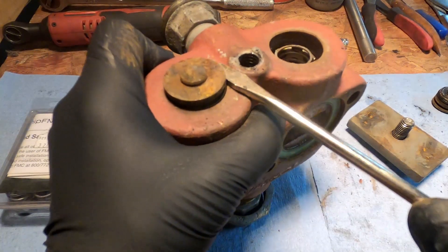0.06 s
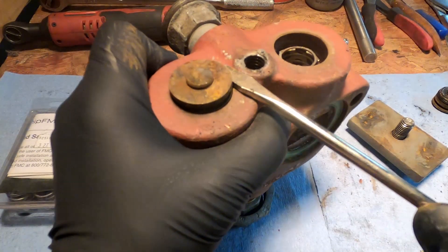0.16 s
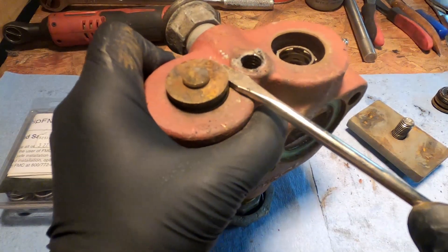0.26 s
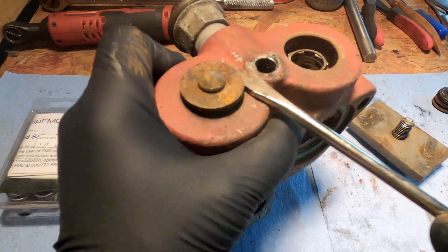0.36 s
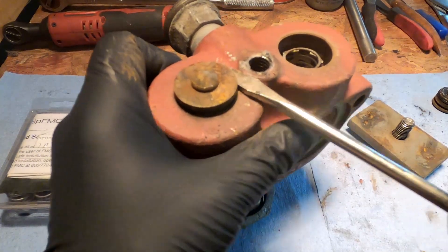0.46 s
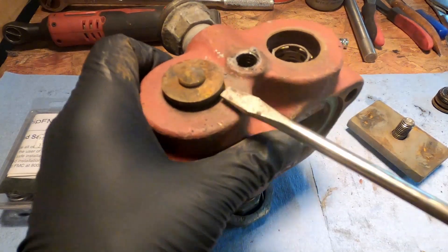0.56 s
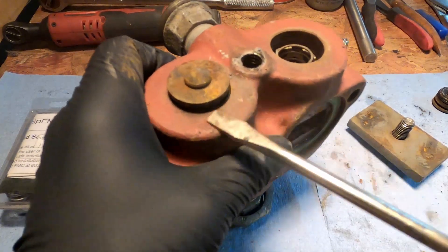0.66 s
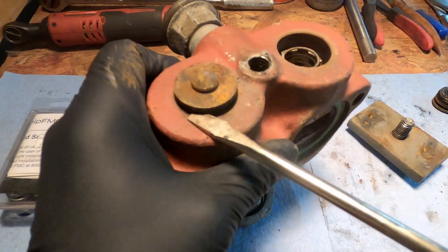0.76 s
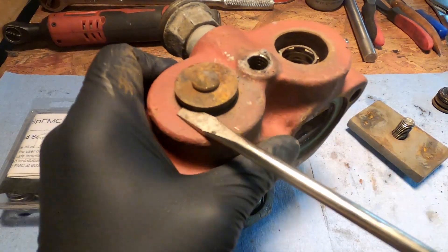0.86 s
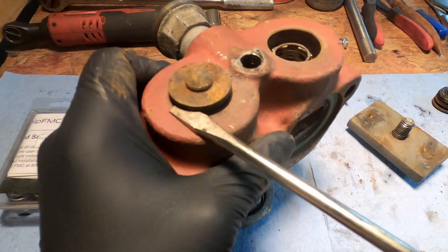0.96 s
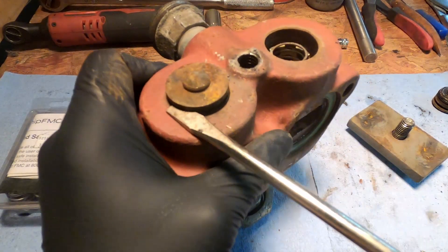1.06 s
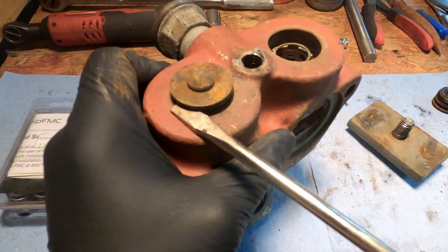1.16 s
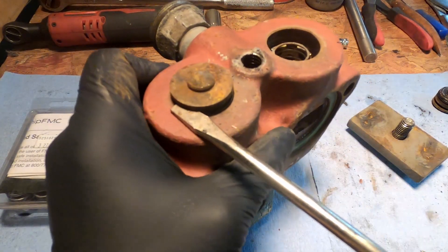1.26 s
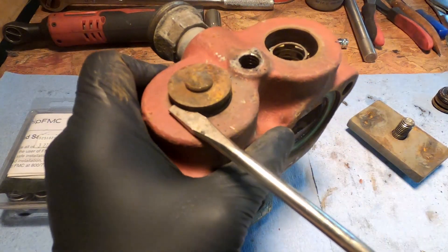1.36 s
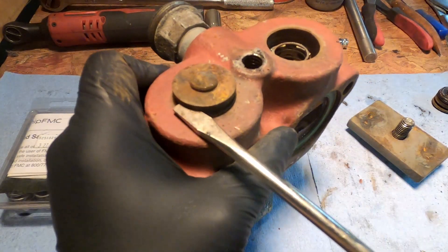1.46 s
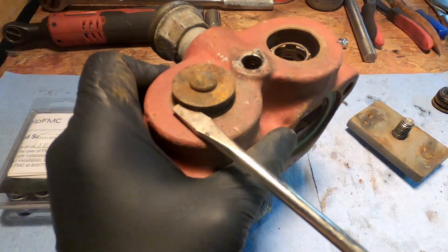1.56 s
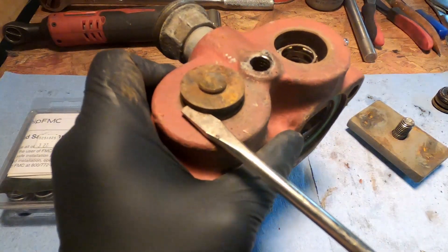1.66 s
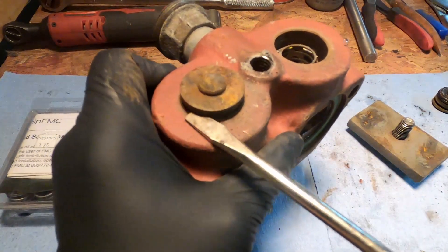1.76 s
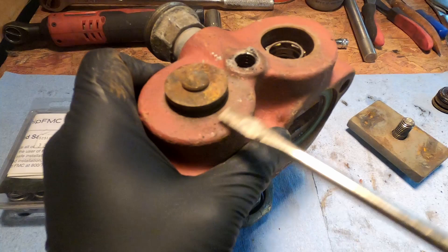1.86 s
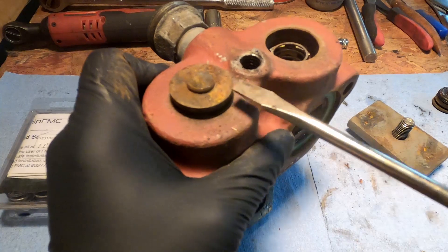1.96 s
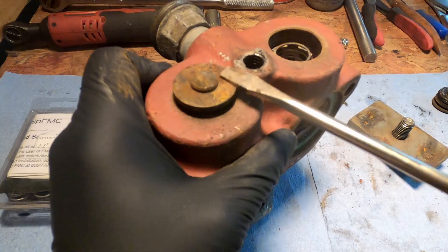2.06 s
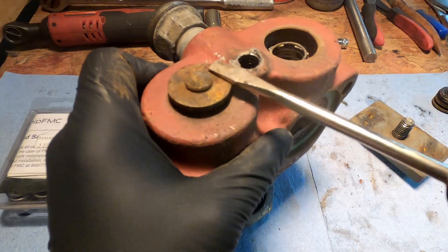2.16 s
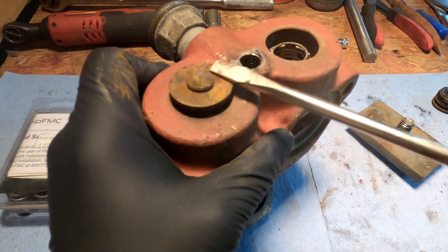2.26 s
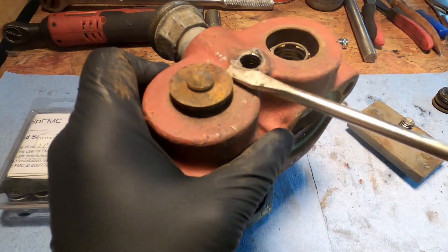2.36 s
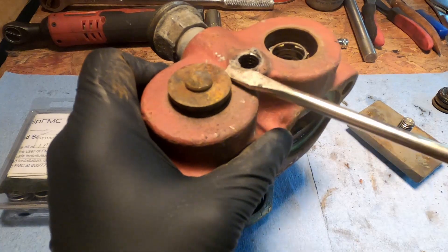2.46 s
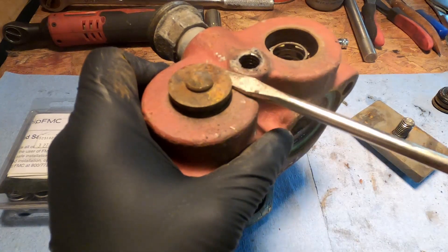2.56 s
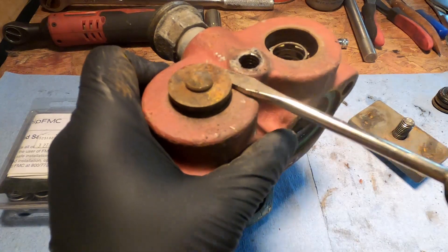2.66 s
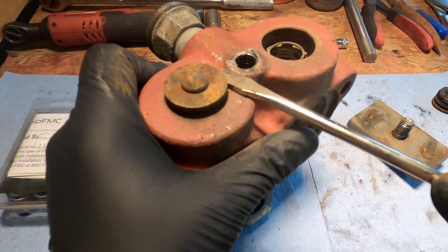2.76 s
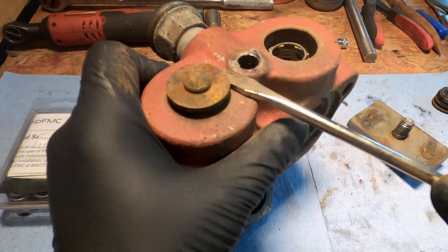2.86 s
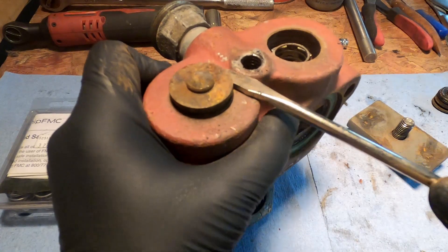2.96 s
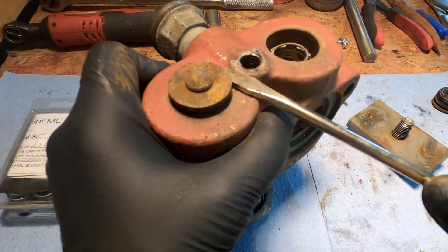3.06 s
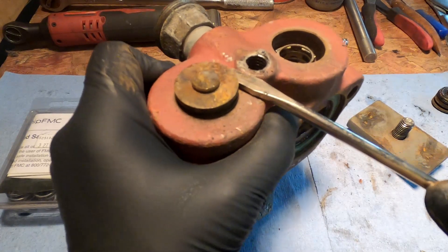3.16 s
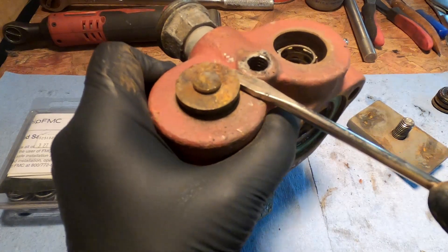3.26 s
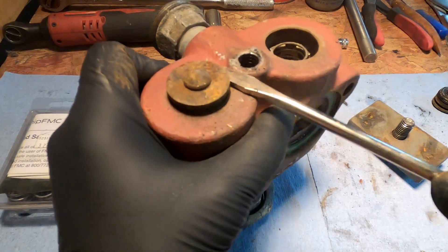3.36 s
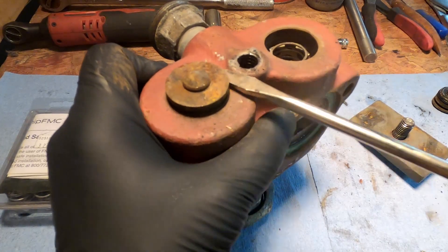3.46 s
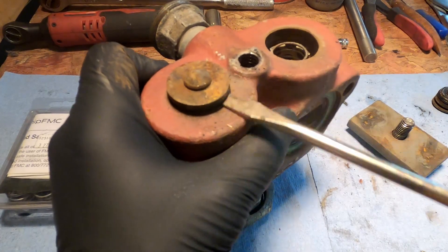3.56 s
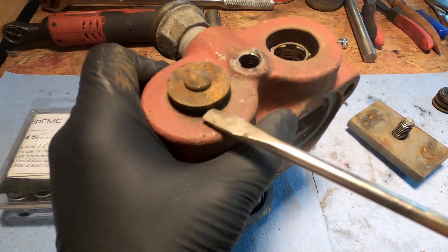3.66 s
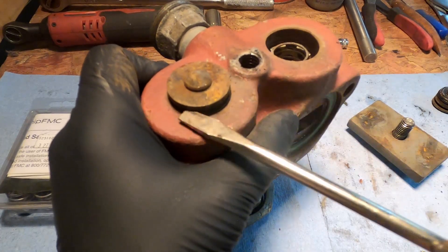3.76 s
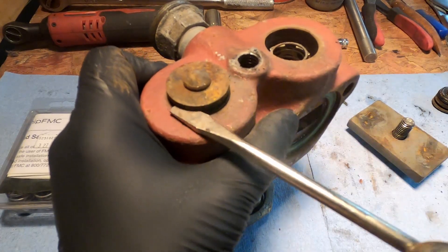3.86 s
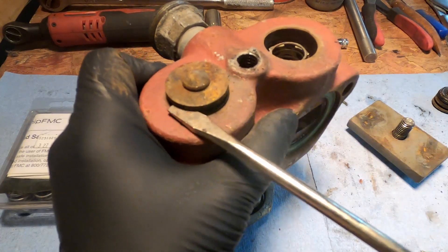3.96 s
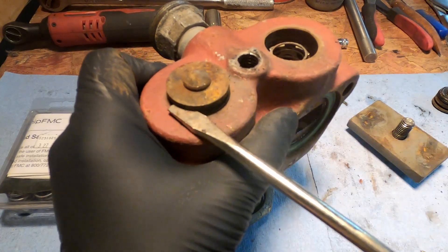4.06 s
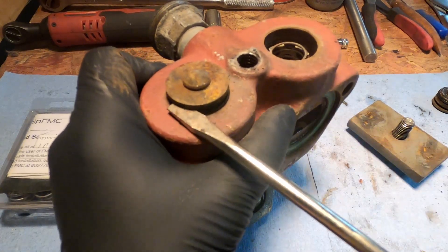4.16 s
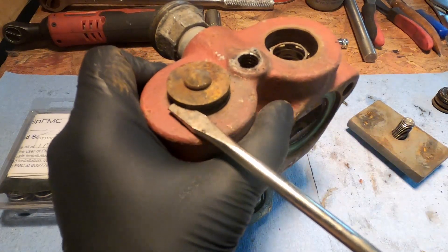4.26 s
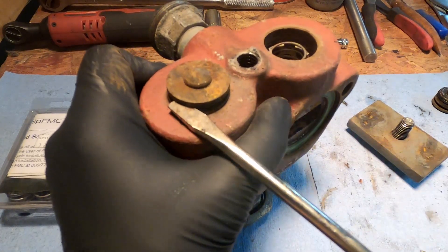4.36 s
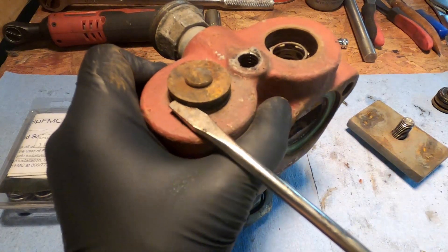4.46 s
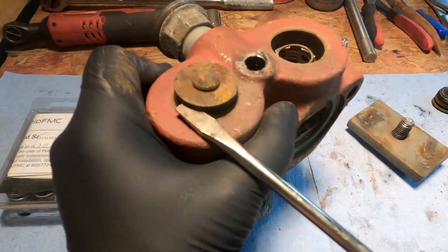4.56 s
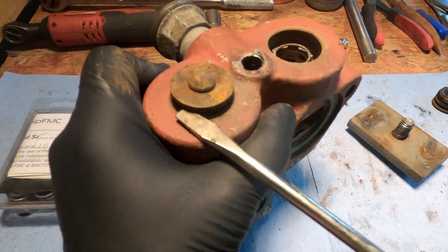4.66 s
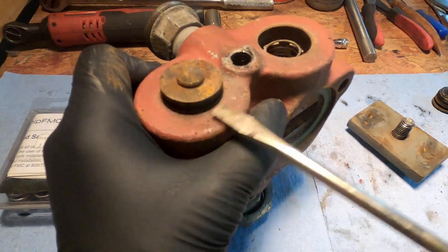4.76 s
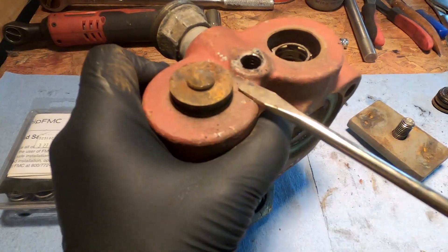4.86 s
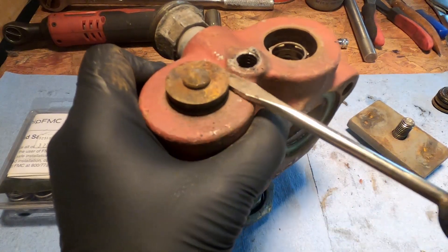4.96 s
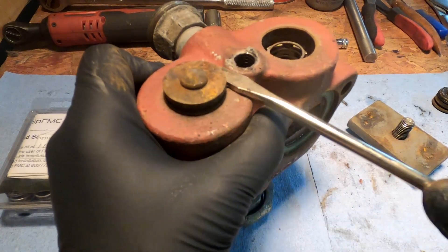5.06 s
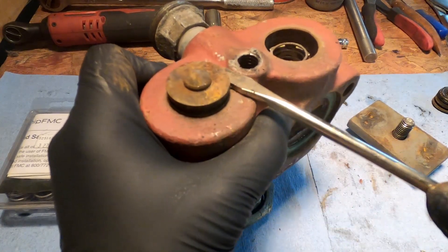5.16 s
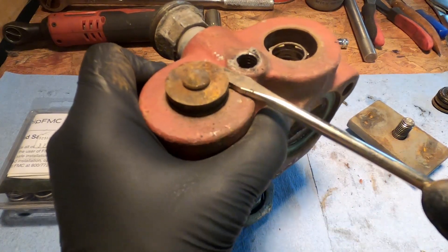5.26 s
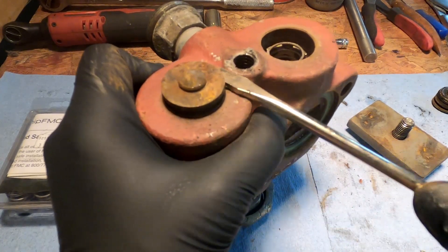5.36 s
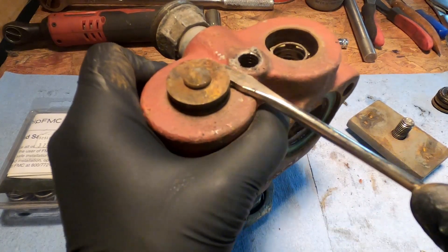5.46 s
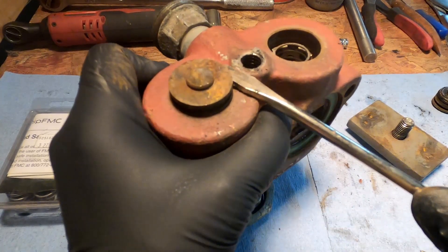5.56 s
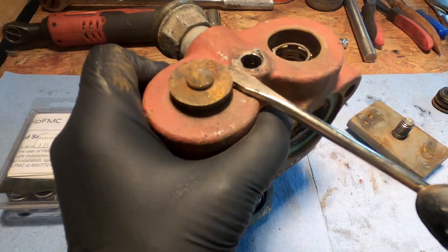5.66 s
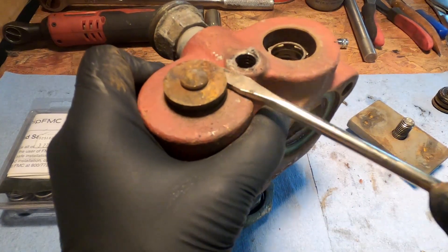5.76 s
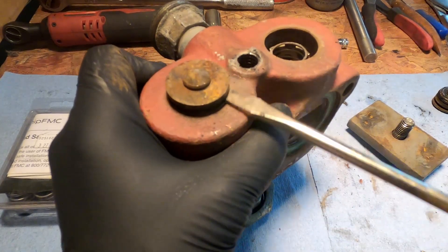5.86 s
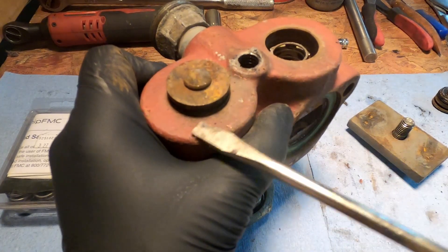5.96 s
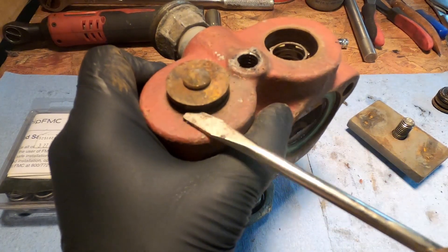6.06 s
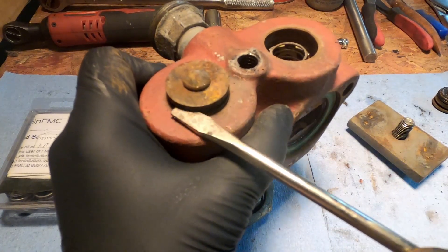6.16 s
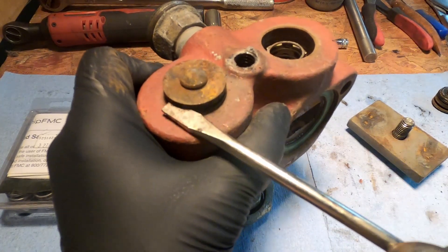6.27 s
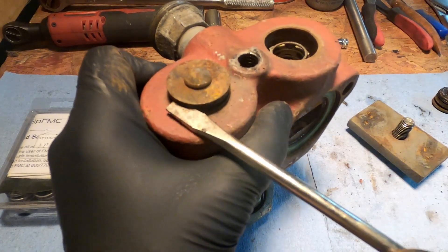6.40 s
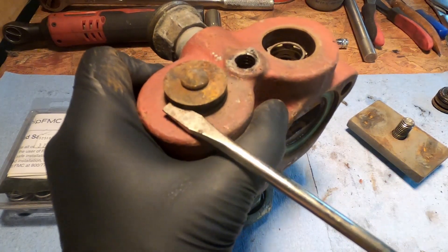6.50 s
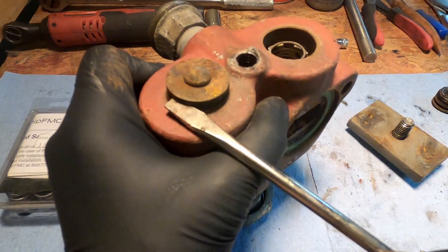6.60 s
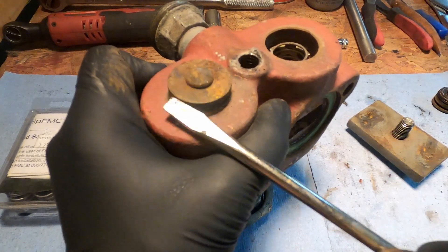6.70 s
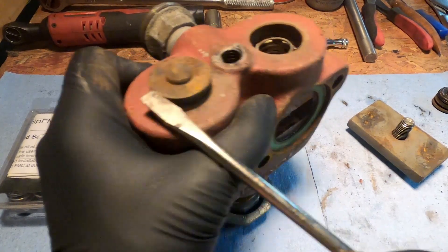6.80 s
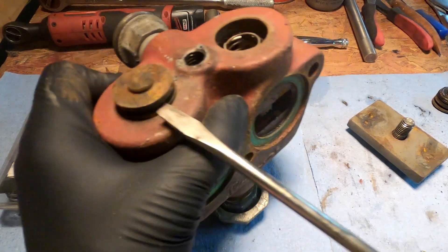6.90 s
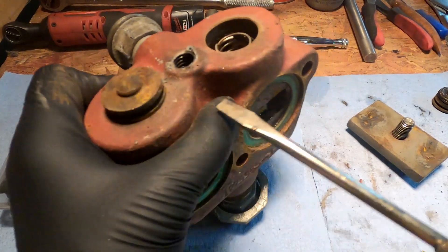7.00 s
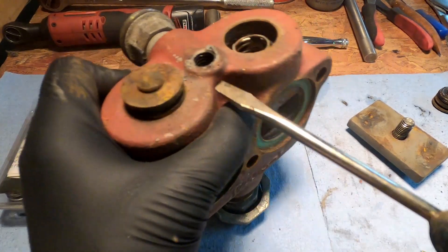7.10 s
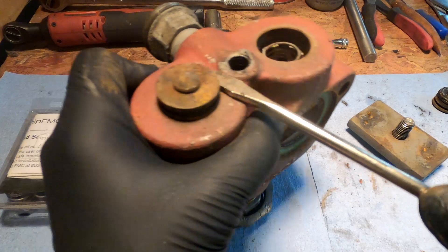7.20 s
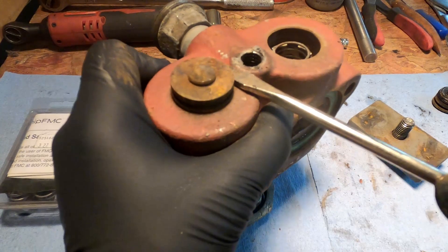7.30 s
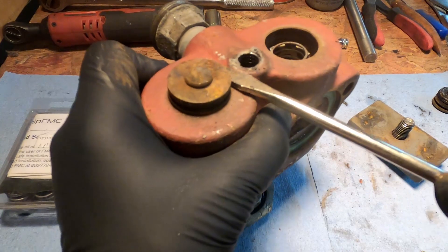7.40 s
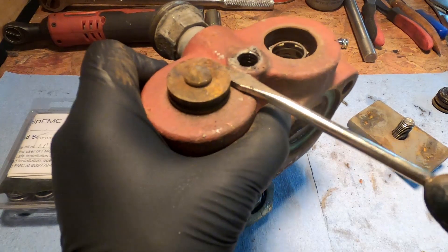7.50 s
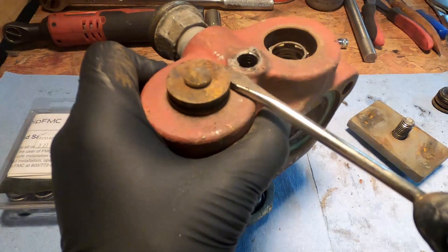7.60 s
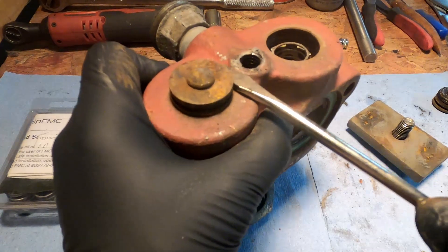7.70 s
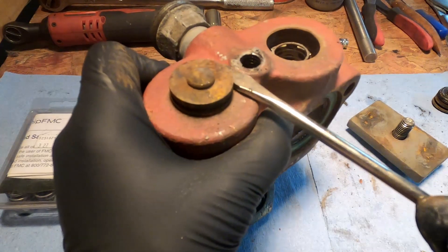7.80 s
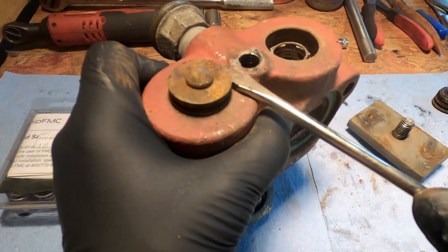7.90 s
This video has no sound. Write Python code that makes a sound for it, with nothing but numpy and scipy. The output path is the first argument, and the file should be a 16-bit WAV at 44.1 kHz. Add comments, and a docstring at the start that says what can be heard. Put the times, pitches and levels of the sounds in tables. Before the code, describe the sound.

Close, dry handling of a heavy metal casting: a screwdriver blade ticks, clacks and briefly scrapes over paint and rust in uneven bursts. Pauses separate the groups. Strong knocks come near 2.6 and 6.2 seconds, then a hard slip with a bright clank and skid near 6.8. The bench thuds and rumbles softly beneath, in a quiet small workshop.

```python
"""A screwdriver blade is pushed under a brass cap on a cast pump head held in a gloved hand.
The blade scrapes over paint (dense uneven clicks) and ticks against cap and casting (clicks with a short
rattle); both ring damped metal modes, and one slip is hard. The workbench rumbles and thuds as noise and
soft pushes through its resonances, and a thin squeal wavers briefly. Feedback delays give the small
workshop a short tail, and filtered noise gives it a faint hush."""
import sys
import numpy as np
from scipy import signal
from scipy.fft import rfft, irfft, next_fast_len
from scipy.io import wavfile

SR = 44100
rng = np.random.default_rng(int(sys.argv[2]) if len(sys.argv) > 2 else 0)


def materialize(psi):
    """Save the field psi as 16-bit PCM at rate SR to the path in sys.argv[1].

    A 1-D psi becomes a single channel; in a 2-D psi each row is a channel.
    """
    bounded = np.clip(np.atleast_2d(psi).T, -1, 1)
    quanta = np.round(bounded * 32767).astype(np.int16)
    wavfile.write(sys.argv[1], SR, quanta)


def natural_amplitude(level_db):
    """Convert a level in decibels to a linear amplitude factor, elementwise."""
    exponent = np.asarray(level_db, float) / 20
    return 10 ** exponent


N = 350154  # length in samples

# Workshop air, relative spectrum: hz, level_db (per Hz)
AIR_SPECTRUM = [(18, -34), (30, 9.5), (65, 5), (118, 3.5), (196, 5.5), (314, -3.5), (399, -5.5),
                (467, -12.5), (547, -21.5), (593, -8), (659, -18.5), (7470, -29.5), (8300, -36.5),
                (10000, -49.5), (16500, -55)]
# Likeness of the air at left and right: hz, likeness (1 = identical)
AIR_LIKENESS = [(60, 0.44), (130, 0.61), (640, 0.2), (15000, 0.068)]
AIR_DB = -62.5  # rms
SHOP_T60_S, WALL_CUT_HZ, SHOP_DB = 0.23, 2800, -22

# Bench shaken by the hands: start_s, top_db, knock_db
BENCH_MOTION = [(0.0, -71, -64), (0.15, -49.5, -56.5), (0.77, -80, -60.5), (0.84, -48, -58),
                (1.39, -59.5, -63.5), (2.32, -67, -59.5), (3.25, -63.5, -82), (3.36, -51, -76.5),
                (3.58, -54, -57.5), (3.63, -75, -54.5), (4.22, -56.5, -71), (4.64, -76, -76),
                (4.71, -67, -63.5), (4.88, -74, -60), (5.64, -67, -75), (6.1, -52.5, -58), (6.21, -74, -58),
                (6.59, -51.5, -80), (6.7, -73, -70), (6.85, -43, -63), (6.96, -52, -45.5),
                (7.23, -75, -66.5), (7.36, -62, -62.5), (7.94, -68, -77)]
# Bench resonances, from slow sway to table top to knocking: centre_hz, width_hz, level_db
SWAY_MODES = [(27.8, 22, 0)]
TOP_MODES = [(80.86, 2.7, 0)]
KNOCK_MODES = [(138, 40, -25.5), (192, 24, -9.5), (205.7, 15, -2.5), (299, 35, -7), (500, 24, -21.5)]
SWAY_DB, SWAY_KICK_DB, SWAY_T60_S = -72.5, -26.5, .45  # steady sway; the hard slip rocks the bench
SLIP_S = 6.834
# Casting knocking on the bench: start_s, push_db
CAST_THUDS = [(0.337, -36.5), (2.5, -42.5), (2.63, -37.5), (3.598, -46), (3.777, -43), (4.639, -49),
              (4.956, -43.5), (6.183, -47.5), (6.117, -43.5), (6.832, -26.5), (7.061, -44.5), (7.278, -41)]

# Faint squeal of the loaded blade: start_s, end_s, pitch_hz, width_hz, level_db
BLADE_SQUEAL = (4.06, 4.3, 1690, 45, -83)

# Casting and blade damped by the glove, nominal modes: pitch_hz, level_db, t60_s
METAL_MODES = [(815, 4, .12), (1080, -5, .025), (1330, -5, .025), (1600, -3, .035), (1800, -5, .03),
               (2300, -1, .025), (2520, -3, .03), (2780, 0, .02), (3030, -3, .03), (3290, -7, .02),
               (3550, -7, .02), (3800, -6, .025), (4150, -5, .025), (4700, -7, .015), (5500, -9, .015),
               (6600, -11, .008), (7400, -11, .008), (8100, -2, .015), (10300, -16, .006)]
# Broad rasp of the contact, relative spectrum: hz, level_db (per Hz)
RASP_SPECTRUM = [(800, 10), (1600, -4), (2800, -16), (4200, -8), (6000, -12), (8300, -4), (10500, -32),
                 (15000, -40)]
# Parts of the metal sound (shank ring, low, middle, upper, bright): low_hz, high_hz
METAL_PARTS = [(750, 890), (950, 2000), (2000, 3500), (3500, 5800), (5800, 16000)]
# Share of the left-right difference in each of those parts: share
PART_SHADING = [0.15, 0.6, 1.1, 1.8, 5]
SPOTS, SPOT_SPREAD_DB = 3, 2.5  # contact spots, and how far mode levels vary between them
SPOT_DETUNE = .025  # relative; grip and contact shift the modes from spot to spot
BODY_CUT_HZ = 700  # so small a body sends little sound below this
COLOUR_FALL_DB = 10.5  # loss one octave away from the colour

# Metal clicks: the blade striking, and three quieter clicks 10 ms apart that lead into the loudest blow:
# start_s, level_db, shank_ring_db, colour (octaves above 1 kHz), bright_share_db
METAL_CLICKS = [(.192, -39, -19, 1.15, -3), (.4996, -28.5, -36, 1.25, -11), (.5356, -38, -22, 1.8, -3),
                (.68, -30.5, 8.5, 0.97, -18), (.7064, -40, -18, 1.2, 0), (.8041, -31, -22, 1.2, -10),
                (.8629, -22, -28, 1.53, -21), (.9237, -40, -20, 1.5, -12), (.9363, -31, -20, 1.3, -10),
                (.98, -34.5, -24, 1.3, -32), (1.5783, -25.5, 0, 0.32, -12.5),
                (1.9907, -35.5, -24, 1.8, -5.5), (2.1325, -28, -9, 0.53, -24),
                (2.1834, -27, -18, 0.96, -25), (2.2525, -49, -17, 1.7, -3), (2.3976, -32, -14, 1, -31),
                (2.6295, -12.5, -36, 1.16, -22), (3.5993, -18, -7.5, 1.11, -9),
                (3.6845, -26, -8, 0.48, -18), (3.7264, -29, -22, 1.34, -9), (3.7725, -16, -11, 1.46, -21),
                (3.8302, -33.5, -3, 0.41, -27), (3.8947, -30, -15, 0.55, -21),
                (3.929, -19, -33, 1.091, -39), (4.1844, -48.5, -20, .9, -9), (4.2906, -51, -27, 2, -5),
                (4.337, -53, -18, 1.4, 1), (4.4722, -34.5, -17, 2.44, -10), (4.789, -32, -23, 0.43, -20),
                (4.827, -34, -24, 0.73, -13), (4.9552, -17, -43, 1.32, -23.5),
                (5.1417, -37.5, -23, 2.3, -9), (5.971, -21.5, -13.5, 1.458, -14.5),
                (6.1157, -18.5, -16, 0.94, -28), (6.1831, -9.5, -10.5, 1.64, -16),
                (6.8034, -46, -16, 1.3, -10), (6.8129, -29, -2, 1.2, -12), (6.8234, -19.5, -1, 1.46, -10.5),
                (6.8347, -1.5, -2, 1.4, -2), (7.0606, -18, -37, 1.17, -15), (7.2733, -24.5, -18, 1.04, -20),
                (7.317, -29, -19, 1.8, -25), (7.3364, -22.5, -2.5, 1.13, -15.5),
                (7.6544, -52.5, -14, 1, -14.5)]
CONTACT_S, RATTLE_SHARE = .0014, .28  # decay of the contact rattle, and its size beside the click
# Faint random ticks scattered through the whole scene: level_db, shank_ring_db, colour, bright_share_db
TICKS_PER_S, TICK, TICK_SPREAD = 4, (-58, -20, 1.9, -5), np.array([3, 3, .3, 3])

# Blade pushed along the paint: start_s, hardest_s, end_s, level_db, colour (octaves above 1 kHz),
# bright_share_db
BLADE_PUSHES = [(.447, 0.464, 0.51, -59.5, 1.33, -12), (0.578, 0.639, 0.62, -53, 1.6, -2),
                (.642, 0.686, 0.7, -36, 1.58, -12.5), (0.702, 0.703, 0.8, -57, 1.76, -4),
                (0.795, 0.864, 0.99, -49, 1.59, -10.5), (0.99, 1.03, 1.15, -71.5, 1.6, -1.5),
                (1.863, 1.87, 1.88, -60.5, 1.3, -5), (1.901, 1.945, 1.962, -50, 0.99, -14),
                (2.129, 2.175, 2.23, -44, 0.97, -15.5), (2.725, 2.752, 2.8, -57, 2.05, 0),
                (2.805, 2.818, 2.853, -49, 1.35, 3), (2.992, 3.06, 3.07, -79.5, 1.6, 9.5),
                (3.36, 3.45, 4.8, -81.5, 1.9, 5), (3.604, 3.656, 3.73, -47.5, 1.5, -13.5),
                (4.387, 4.47, 4.54, -73.5, 2, 3), (4.783, 4.781, 4.8, -55, .7, -24),
                (4.816, 4.825, 4.84, -52, .7, -24), (4.937, 5.004, 5.06, -58.5, 1.05, -20),
                (5.06, 5.13, 5.165, -59, 1.55, -8), (5.538, 5.599, 5.59, -73.5, 1.4, 4.5),
                (5.906, 6, 6.045, -50.5, 1.5, -7.5), (6.635, 6.675, 6.67, -67.5, 2.4, 3),
                (7.268, 7.32, 7.345, -43, .9, -20.5)]
PUSH_START_DB, PUSH_END_DB = -9.5, -12  # relative to the hardest moment
LIFT_S, LIFT_DB = 0.024, -33  # the blade eases off after a push
# Blade skidding on after a blow: start_s, length_s, level_db, colour (octaves above 1 kHz), bright_share_db
BLADE_SKIDS = [(0.193, 0.14, -55.5, 1.15, -2), (0.51, 0.22, -60, 2.1, 1), (1.585, .05, -63, .6, -1),
               (1.996, 0.049, -74, 2.1, 3), (2.293, 0.066, -52, 0.58, -18), (2.392, 0.12, -48, 0.96, -14.5),
               (2.452, 0.13, -62, 2.6, 0.5), (2.636, 0.14, -51, 1.7, -26), (3.782, 0.077, -55.5, 1.8, -24),
               (3.842, 0.11, -63, .6, -30), (3.899, .04, -58, 0.7, -27), (3.938, 0.13, -57, 1.5, -10.5),
               (6.116, 0.087, -48.5, 1.34, -23.5), (6.183, 0.16, -44.5, 1.92, -17),
               (6.836, .3, -42.5, 1.83, -12.5), (7.07, 0.12, -66, 1.76, -14.5), (7.396, 0.1, -55.5, 2.2, 3),
               (7.664, 0.073, -78.5, 0.86, 2)]
SKID_END_DB = -32.5  # change over the whole skid
SHANK_DB, SHANK_FOLLOWS = -15.5, 1.1  # the shank rings most where the contact sounds low

LEFT_LAG_S = 5e-5
SCRAPE_PAN_DB, CLICK_PAN_DB = -1.5, -2  # left minus right


def rms_one(x):
    """Scale to unit rms."""
    return x / np.sqrt(np.mean(x ** 2) + 1e-20)


def in_time(rows):
    """Columns of a curve table, one value a sample."""
    s, *columns = np.transpose(rows)
    return [np.interp(np.arange(N) / SR, s, column) for column in columns]


def at_hz(points, hz):
    """Read a spectrum on a log-frequency axis."""
    point_hz, values = np.transpose(points)
    return np.interp(np.log(hz), np.log(point_hz), values)


def drift(rate_hz):
    """Slow random wander of unit rms, drawn every 40 samples and joined by lines."""
    r = np.exp(-80 * np.pi * rate_hz / SR)
    white = rng.standard_normal(N // 40 + 2002)
    slow = signal.lfilter([1], [1, -2 * r, r * r], white)[2000:]  # skip the filter's start
    return np.interp(np.arange(N) / 40, np.arange(len(slow)), rms_one(slow))


def ring(clicks, hz, t60_s):
    """A unit click sets a decaying sine of starting height 1 ringing."""
    r, w = natural_amplitude(-60 / (t60_s * SR)), 2 * np.pi * hz / SR
    return signal.lfilter([0, np.sin(w)], [1, -2 * r * np.cos(w), r * r], clicks + 1e-18)


def bands(low_hz, high_hz):
    """Half-octave band-passes with their centres."""
    edges = 30 * 2 ** np.arange(0, 9.3, .5)
    return [(np.sqrt(a * b), signal.butter(2, [a, b], "band", fs=SR, output="sos"))
            for a, b in zip(edges, edges[1:]) if low_hz < np.sqrt(a * b) < high_hz]


def placed(x, pan_db):
    """Pan between the two microphones; the left one hears it a little later."""
    late = np.interp(np.arange(N) - LEFT_LAG_S * SR, np.arange(N), x)
    return np.array([late * natural_amplitude(pan_db / 2), x * natural_amplitude(-pan_db / 2)])


def hush():
    """Air noise of the workshop, slightly patchy, with its own left-right likeness in each band."""
    out, white = 0, rng.standard_normal((2, 2, N))
    for k, (hz, sos) in enumerate(bands(30, 17000)):
        mid, side = signal.sosfilt(sos, white[k % 2])  # neighbouring bands use separate noise
        alike = np.clip(at_hz(AIR_LIKENESS, hz), -1, 1)
        gain = natural_amplitude(at_hz(AIR_SPECTRUM, hz) + 1.0 * drift(4))
        out = out + gain * (np.sqrt(1 + alike) * mid + np.sqrt(1 - alike) * side * [[1], [-1]])
    return natural_amplitude(AIR_DB) * rms_one(out)


def workshop(x):
    """Ten feedback delays a side, duller on every round, blurred by rough walls (three all-passes)."""
    size = next_fast_len(N + SR)
    w = 2 * np.pi * np.arange(size // 2 + 1) / size
    dull = (1 + (w * SR / (2 * np.pi * WALL_CUT_HZ)) ** 2) ** -0.25
    out = np.zeros((2, len(w)), complex)
    for k, lag in enumerate(rng.uniform(0.0065, 0.024, 20) * SR):
        loop = natural_amplitude(-60 * lag / SR / SHOP_T60_S) * dull * np.exp(-1j * w * lag)
        out[k % 2] += (-1) ** (k // 2) * loop / (1 - loop)
    for lag in rng.uniform(0.00066, 0.0044, 3) * SR:
        z = np.exp(-1j * w * lag)
        out *= (z - .6) / (1 - .6 * z)
    return irfft(out * rfft(x, size), size)[:, :N]


def shaken(modes, level_db, lumpy_db):
    """Noise of uneven strength drives two-pole resonances."""
    push = rng.standard_normal(N) * natural_amplitude(lumpy_db * drift(11))
    out = 0
    for hz, width, db in modes:
        r = np.exp(-np.pi * width / SR)
        poles = [1, -2 * r * np.cos(2 * np.pi * hz / SR), r * r]
        out = out + natural_amplitude(db) * rms_one(signal.lfilter([1, 0, -1], poles, push))
    return natural_amplitude(level_db) * rms_one(out)


def bench():
    """The hands shake the bench: sway and table top are alike in both microphones, knocking less so."""
    top_db, knock_db = in_time(BENCH_MOTION)
    t = np.arange(N) / SR
    rocked = (t > SLIP_S) * natural_amplitude(SWAY_KICK_DB - 60 * abs(t - SLIP_S) / SWAY_T60_S)
    sway = shaken(SWAY_MODES, SWAY_DB, lumpy_db=2.0)
    sway = sway + rocked * shaken(SWAY_MODES, 0, lumpy_db=1.5)
    top = shaken(TOP_MODES, top_db, lumpy_db=1.0)
    mid = shaken(KNOCK_MODES, knock_db, lumpy_db=3.0)
    side = shaken(KNOCK_MODES, knock_db, lumpy_db=0.5)
    return sway + top + mid + np.sqrt(1 - .92) * side * [[1], [-1]]


def thuds():
    """A soft push sets the knocking modes of the bench ringing; wide modes die sooner."""
    pushes = np.zeros(N)
    pushes[[round(s * SR) for s, db in CAST_THUDS]] = natural_amplitude([db for s, db in CAST_THUDS])
    rung = sum(natural_amplitude(db) * ring(pushes, hz, 3.4 / width) for hz, width, db in KNOCK_MODES)
    return signal.lfilter([.1], [1, -.9], rung)  # softens the push


def squeal():
    """A thin wavering tone, narrow noise that swells and fades, while the blade creeps under load."""
    start, end, hz, width, db = BLADE_SQUEAL
    t = np.arange(N) / SR
    swell = np.sin(np.pi * np.clip((t - start) / (end - start), 0, 1)) ** .5
    return placed(swell * shaken([(hz, width, 0)], db, lumpy_db=-7.0), SCRAPE_PAN_DB)


def metal_parts(damping, rasp_db, top_hz):
    """What one click draws from the metal, modes plus broad rasp, split into parts of energy 1."""
    click = np.zeros(SR // 6)
    click[0] = 1
    rung = rasp = 0
    # neighbours swing in opposite sense, so no holes open between them
    for k, (hz, db, t60_s) in enumerate(METAL_MODES):
        gain = (-1) ** k * natural_amplitude(db + rng.normal(0, SPOT_SPREAD_DB))
        detuned_hz = hz * (1 + SPOT_DETUNE * (k > 0) * rng.normal())  # the lowest mode stays put
        rung = rung + gain * ring(click, detuned_hz, damping * t60_s)
    for k, (hz, sos) in enumerate(bands(800, 16000)):
        rasp = rasp + (-1) ** k * natural_amplitude(at_hz(RASP_SPECTRUM, hz)) * signal.sosfilt(sos, click)
    both = rms_one(rung) + natural_amplitude(rasp_db) * rms_one(rasp)
    both = signal.sosfilt(signal.butter(4, top_hz, fs=SR, output="sos"), both)
    both = signal.sosfilt(signal.butter(4, BODY_CUT_HZ, "high", fs=SR, output="sos"), both)
    parts = [signal.sosfilt(signal.butter(2, edges, "band", fs=SR, output="sos"), both)
             for edges in METAL_PARTS]
    return [sense * rms_one(p) / np.sqrt(len(p)) for p, sense in zip(parts, (1, -1, 1, -1, 1))]


def shares(colour):
    """Level in dB of the low, middle and upper part: a hump around the colour."""
    # 964000 Hz squared: the reference centre squared, close to 1 kHz
    return [-COLOUR_FALL_DB * (np.log2(low * high / 964000.0) / 2 - colour) ** 2
            for low, high in METAL_PARTS[1:4]]


def metal_clicks():
    """Each listed click or random tick is an impulse and a short rattle that rings the metal."""
    count = int(TICKS_PER_S * N / SR)
    tick_s = rng.uniform(0, N / SR - .1, count)
    ticks = np.c_[tick_s, TICK + TICK_SPREAD * rng.standard_normal((count, 4))]
    s, level_db, shank_db, colour, bright_db = np.transpose(np.r_[METAL_CLICKS, ticks])
    starts = np.round(s * SR).astype(int)
    t = np.arange(int(.008 * SR)) / SR
    contacts = RATTLE_SHARE * rng.standard_normal((len(starts), len(t))) * np.exp(-t / CONTACT_S)
    contacts[:, 0] = 1  # the impulse itself
    spots = [metal_parts(damping=1.0, rasp_db=3.5, top_hz=10760) for spot in range(SPOTS)]
    out = np.zeros((len(METAL_PARTS), N + SR))
    for k, share_db in enumerate([shank_db, *shares(colour), bright_db]):
        gains = natural_amplitude(level_db + share_db)
        for n, (i, gain, contact) in enumerate(zip(starts, gains, contacts)):
            rung = signal.fftconvolve(contact, spots[n % SPOTS][k])
            out[k, i:i + len(rung)] += gain * rung
    return out[:, :N]


def strokes():
    """Pushes swell and ease off, skids die away: (times, levels in dB, colour, bright share in dB)."""
    out = []
    for start, hardest, end, db, colour, bright_db in BLADE_PUSHES:
        times = [start, min(max(start, hardest), end), end, end + LIFT_S]
        levels = db + np.array([PUSH_START_DB, 0, PUSH_END_DB, PUSH_END_DB + LIFT_DB])
        out.append((times, levels, colour, bright_db))
    for start, length, db, colour, bright_db in BLADE_SKIDS:
        out.append(([start, start + length], [db, db + SKID_END_DB], colour, bright_db))
    return out


def scrape():
    """The edge catches on paint and rust: dense uneven clicks ring the metal and rasp broadly."""
    per_s, spread_db = 2500, 4.5
    sizes = natural_amplitude(spread_db * np.minimum(rng.exponential(1, N), 4)) * rng.choice([-1, 1], N)
    clumps = natural_amplitude(2.0 * drift(80))
    grains = rms_one(sizes * (rng.random(N) < per_s / SR) * clumps)
    # the strokes go round a few spots, each waking the modes its own way
    spots = [metal_parts(damping=0.98, rasp_db=-2, top_hz=14000) for spot in range(SPOTS)]
    out = np.zeros((len(METAL_PARTS), N + SR))
    for n, (times, levels, colour, bright_db) in enumerate(strokes()):
        a, b = int(times[0] * SR), int(times[-1] * SR)
        rubbed = grains[a:b] * natural_amplitude(np.interp(np.arange(a, b) / SR, times, levels))
        body_db = shares(colour)
        shank_db = SHANK_DB + SHANK_FOLLOWS * body_db[0]
        for k, share_db in enumerate([shank_db, *body_db, bright_db]):
            rung = signal.fftconvolve(rubbed, spots[n % SPOTS][k])
            out[k, a:a + len(rung)] += natural_amplitude(share_db) * rung
    return out[:, :N]


def scene():
    """Work at the pump, the bench under it, the room around it."""
    rubbed, thud, clicked = scrape(), thuds(), metal_clicks()
    near = 0
    # the body of the recorder shades the far microphone more as pitch rises
    for rub, click, shade in zip(rubbed, clicked, PART_SHADING):
        near = near + placed(rub, shade * SCRAPE_PAN_DB) + placed(click, shade * CLICK_PAN_DB)
    tail = natural_amplitude(SHOP_DB) * workshop(sum(rubbed) + sum(clicked) + thud)
    return near + thud + tail + bench() + hush() + squeal()


def top_cut(x):
    """Nothing passes above the cut-off."""
    return signal.sosfilt(signal.butter(12, 16660, fs=SR, output="sos"), x)


def record(dry):
    """The microphones' top is cut steeply: 60 dB down from 16.5 kHz."""
    mix = signal.sosfilt(signal.cheby2(10, 60, 16500, fs=SR, output="sos"), dry)
    return top_cut(mix)


dry = scene()
out = record(dry)
materialize(out)
```